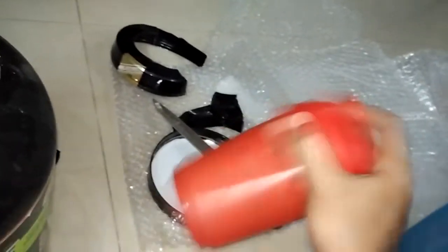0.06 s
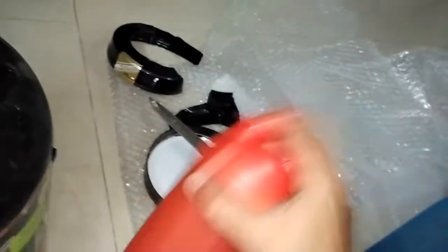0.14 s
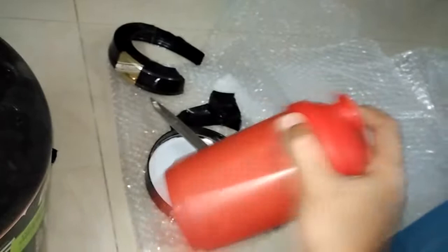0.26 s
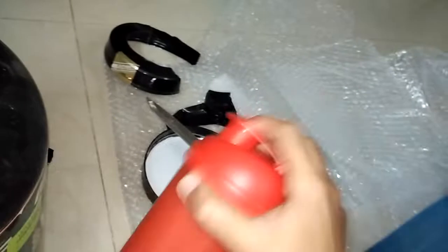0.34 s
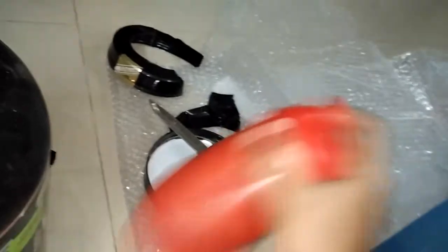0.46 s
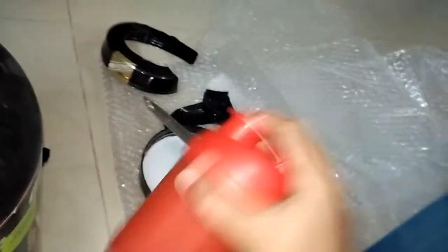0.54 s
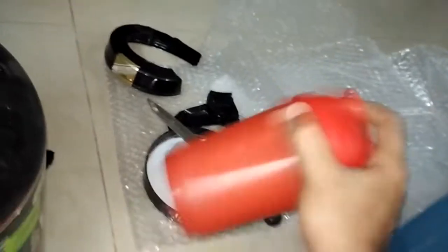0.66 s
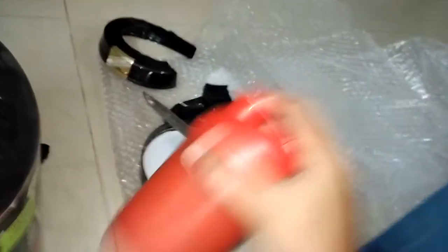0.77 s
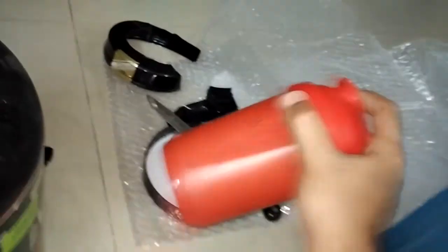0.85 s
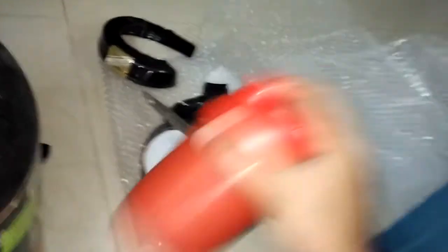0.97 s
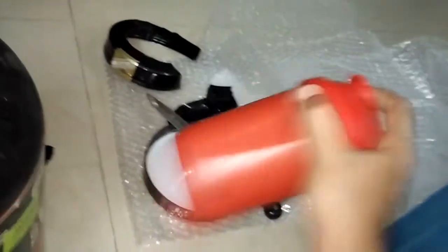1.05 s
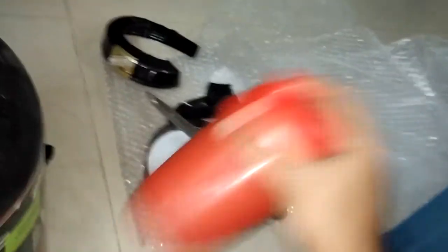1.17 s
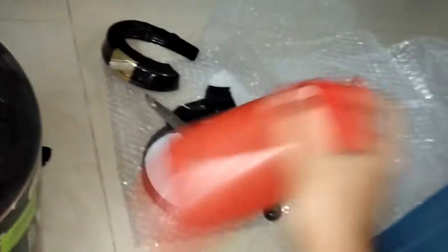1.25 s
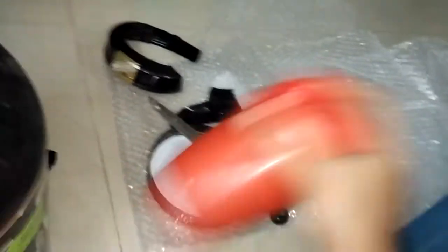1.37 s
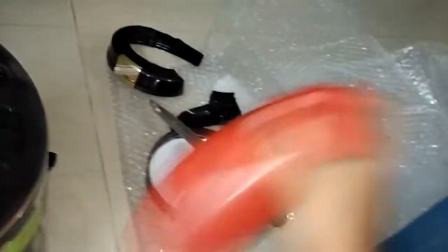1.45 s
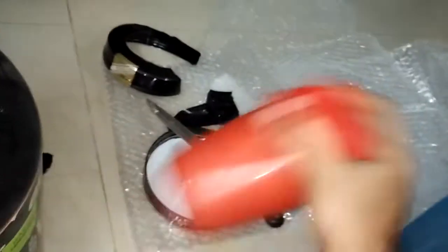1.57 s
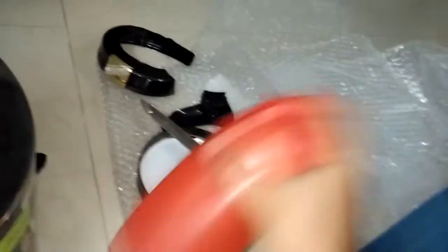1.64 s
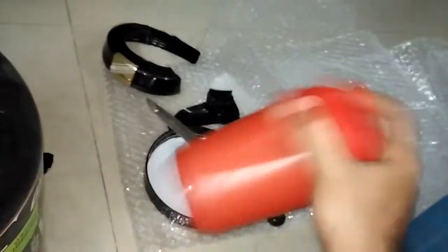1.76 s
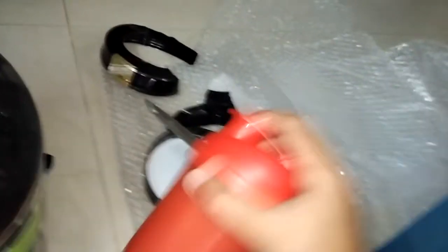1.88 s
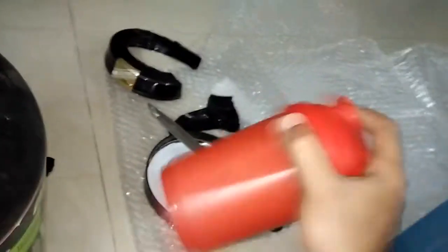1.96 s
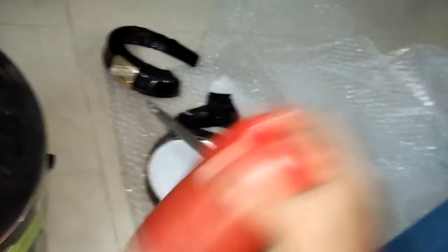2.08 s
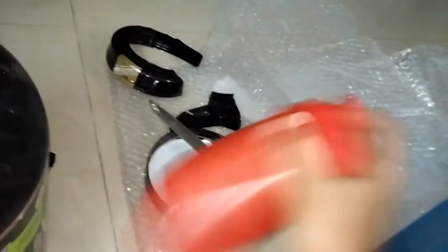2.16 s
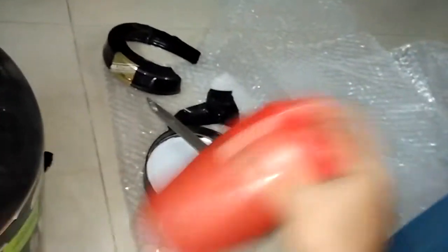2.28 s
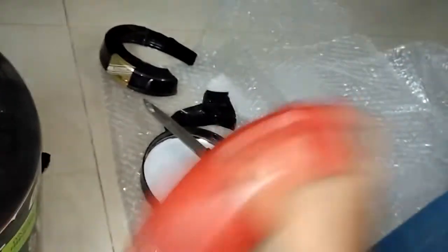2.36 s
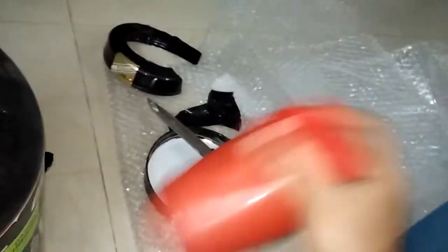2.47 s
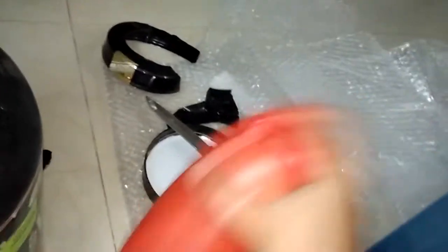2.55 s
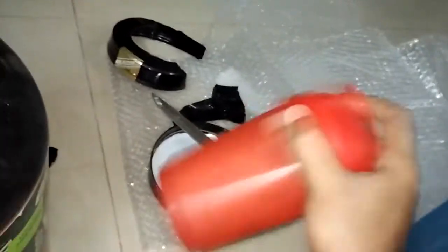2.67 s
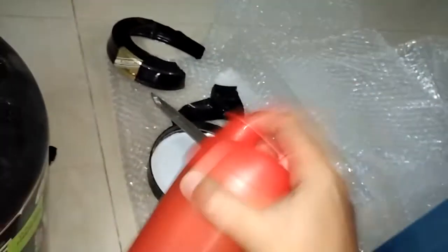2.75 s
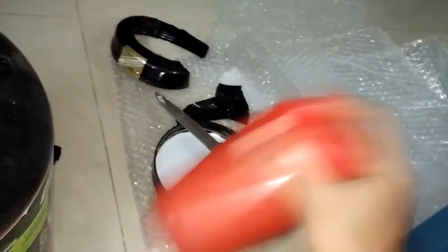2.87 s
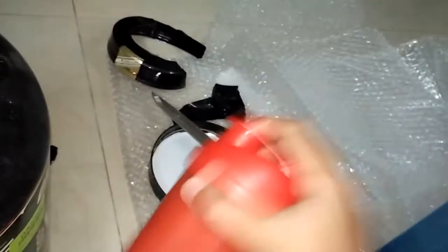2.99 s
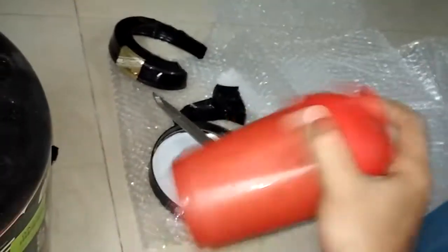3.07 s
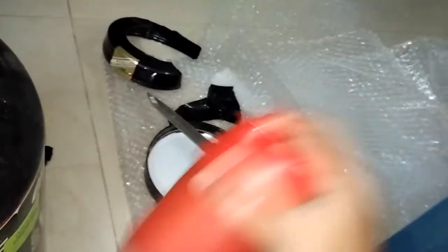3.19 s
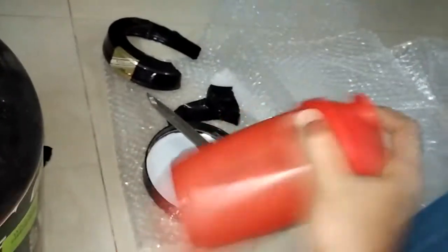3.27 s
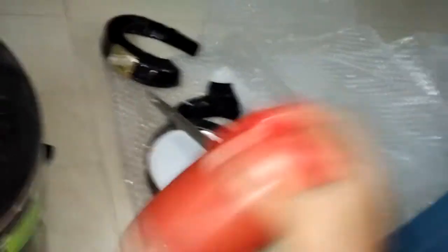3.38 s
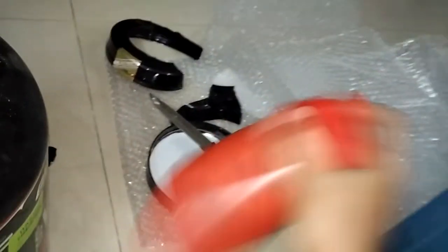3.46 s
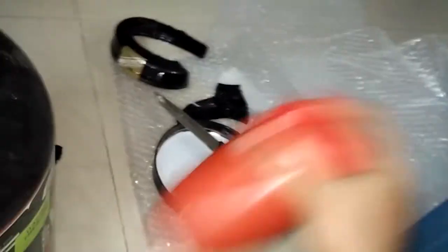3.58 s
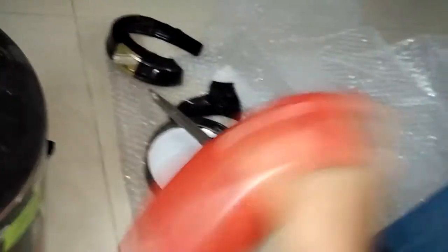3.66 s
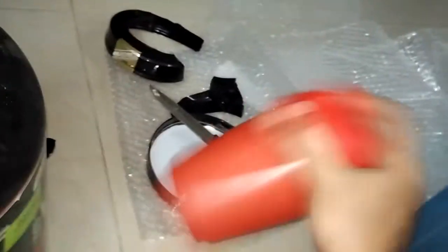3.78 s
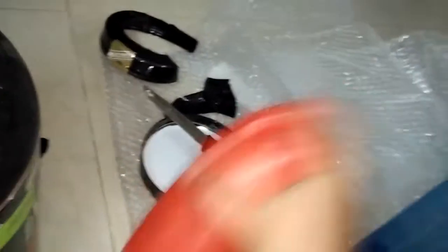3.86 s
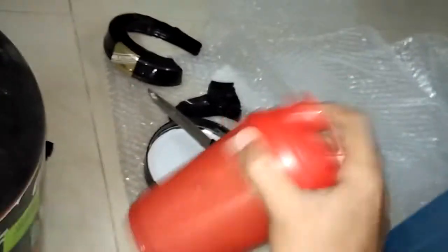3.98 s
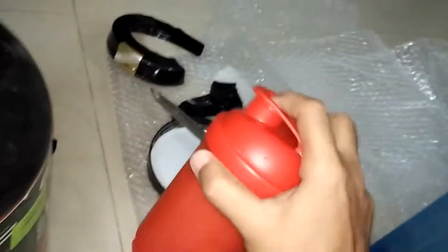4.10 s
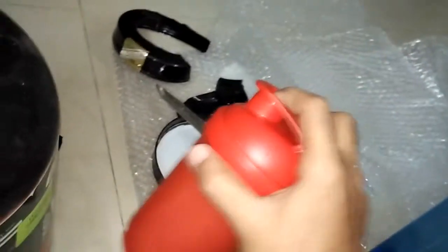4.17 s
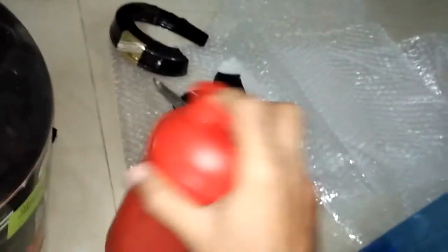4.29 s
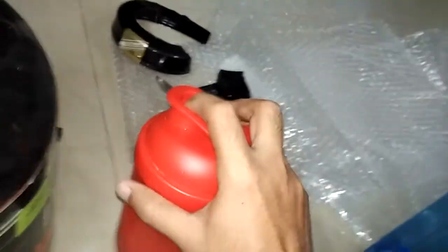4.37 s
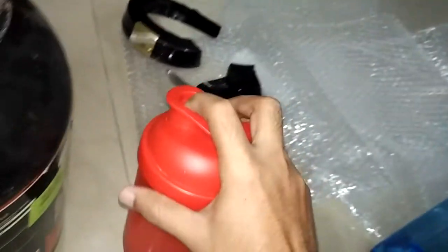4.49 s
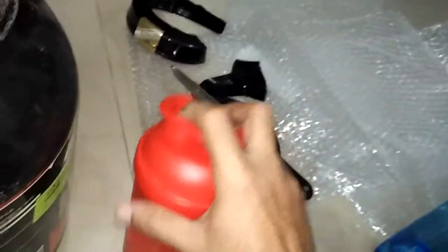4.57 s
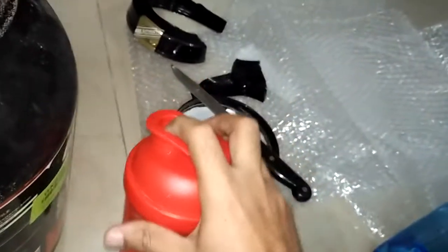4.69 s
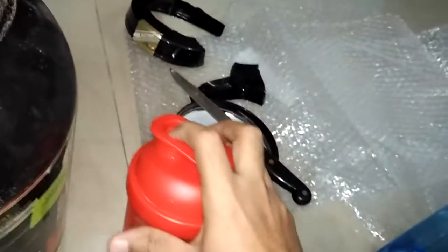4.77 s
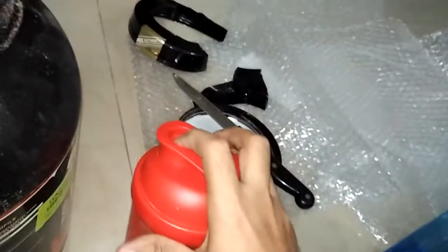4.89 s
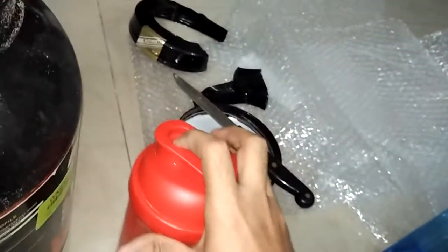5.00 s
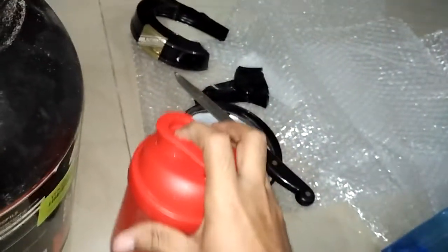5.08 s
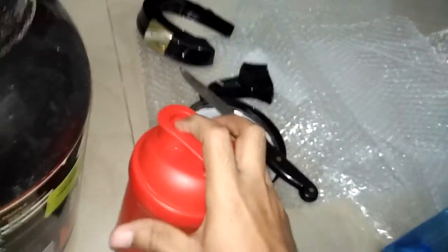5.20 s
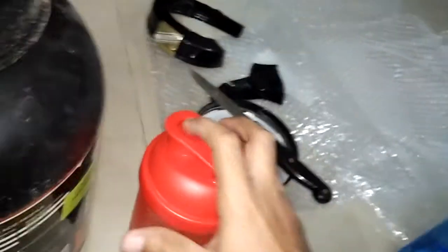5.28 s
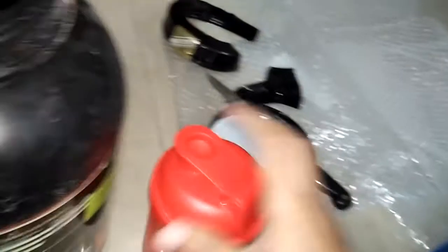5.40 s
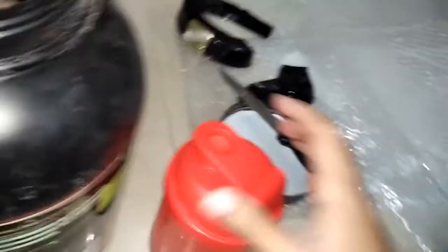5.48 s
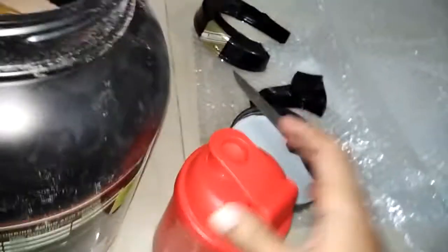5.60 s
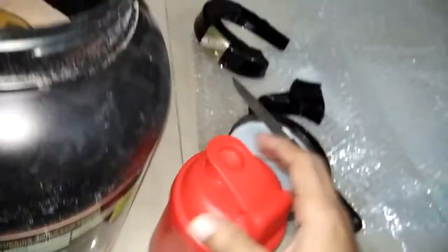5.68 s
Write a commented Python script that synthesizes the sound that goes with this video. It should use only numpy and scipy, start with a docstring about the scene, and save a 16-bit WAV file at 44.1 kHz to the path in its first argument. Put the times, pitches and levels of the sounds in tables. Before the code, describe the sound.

A phone close by picks up vigorous shaking of a drink in a plastic bottle: bright hissy spray, slapping liquid, short ringing bubble pops and small lid clicks in steady rhythm. The sloshing fades to a few drops, then a loud crack-like set-down, a faint slide and a final muted knock, over low quiet room noise.

```python
"""A plastic shaker bottle with a drink in it is shaken hard, about five times a second, close to a phone in a bare room.
In every shake the liquid slams into the lid (coloured noise), bursts an air pocket (a short ringing tone),
sprays through the mixing grid (grainy noise) and gurgles back to the base (a cloud of tiny tones).
After a last weak slosh the bottle is set down with a sharp knock (thump, crack and ringing modes),
shifted a little with a scrape, and knocks once more as the hand lets go."""
import sys
import numpy as np
from scipy import signal
from scipy.fft import rfft, irfft, next_fast_len
from scipy.io import wavfile
from scipy.ndimage import uniform_filter1d

SR = 44100
rng = np.random.default_rng(int(sys.argv[2]) if len(sys.argv) > 2 else 0)


def put_to_file(sound):
    """Save the sound as 16-bit audio at rate SR, in the file named by the first command-line argument."""
    columns = np.atleast_2d(sound).T  # one column per channel
    safe = np.clip(columns, -1, 1)
    whole_steps = np.round(safe * 32767)
    wavfile.write(sys.argv[1], SR, whole_steps.astype(np.int16))


N = 253132
T = np.arange(N) / SR


def undb(db):
    """Decibels to gain."""
    return 10 ** (np.asarray(db) / 20)


def at(points, hz):
    """Read (Hz, value) points on a log-frequency axis."""
    point_hz, value = np.transpose(points)
    return np.interp(np.log(hz + 1), np.log(point_hz), value)


def unit_power(gain):
    """Scale a gain curve to a mean power of one."""
    return gain / np.sqrt(np.mean(gain ** 2))


def colour(x, points):
    """Filter by a spectrum, keeping the power of white noise."""
    size = x.shape[-1]
    gain = undb(at(points, np.fft.rfftfreq(size, 1 / SR)))
    return irfft(rfft(x) * unit_power(gain), size)


def low_pass(x, order, cutoff_hz):
    """Take off the treble above a cut-off."""
    return signal.sosfilt(signal.butter(order, cutoff_hz, fs=SR, output="sos"), x)


def noise(size, apart_hz=1500):
    """Noise at two close ports: alike in the bass, unrelated in the treble."""
    size_fast = next_fast_len(size, True)
    mid, side = rfft(rng.standard_normal((2, size_fast)))
    alike = 0.95 / (1 + (np.fft.rfftfreq(size_fast, 1 / SR) / apart_hz) ** 3)
    mid = mid * np.sqrt((1 + alike) / 2)
    side = side * np.sqrt((1 - alike) / 2)
    return irfft(np.array([mid + side, mid - side]), size_fast)


def grainy(points, grain_db, grain_samples=40):
    """Crowds of short grains of uneven level and a common spectrum; 40 samples make millisecond droplets."""
    x = noise(N)
    drift = uniform_filter1d(rng.standard_normal(x.shape[1]), grain_samples)
    grains = undb(grain_db * np.sqrt(grain_samples) * drift)
    return colour(x * unit_power(grains), points)[:, :N]


def patchy(x, patchy_db, size=256):
    """Sheets of liquid open and close cavities, so patches of the spectrum swell and fade within about 10 ms."""
    spectrum = signal.stft(x, nperseg=size)[2]
    field = rng.standard_normal(spectrum.shape[1:])
    field = uniform_filter1d(field, size=3, axis=0)  # across frequency
    field = uniform_filter1d(field, size=4, axis=1)  # across time
    gain = undb(patchy_db * np.minimum(field / field.std(), 2))
    return signal.istft(spectrum * unit_power(gain), nperseg=size)[1][:, :N]


def add(out, s, sound):
    """Mix a sound in at a time."""
    i = max(int(s * SR), 0)
    out[:, i:i + sound.shape[-1]] += sound[..., :N - i]


def swells(hits, levels_db, delay_s, rise_s, fall_s):
    """One smooth swell for each hit, dying away exponentially; their powers add."""
    power = np.zeros(N)
    for s, db in zip(hits, levels_db):
        start = s + delay_s
        near = slice(*np.searchsorted(T, [start, start + 1]))
        age = T[near] - start
        rise = np.sin(np.pi / 2 * np.minimum(age / rise_s, 1)) ** 2
        fall = np.exp(-np.maximum(age - rise_s, 0) / fall_s)
        power[near] += (undb(db) * rise * fall) ** 2
    return np.sqrt(power)


def bubble(hz, cycles, lag, size=1100):
    """An air pocket rings for a few cycles, rising a little; it reaches the right port lag seconds later."""
    age = np.maximum(np.arange(size) / SR - np.array([[-lag], [lag]]) / 2, 0)
    turns = hz * age
    tone = np.sin(2 * np.pi * turns * (1 + 0.0016 * turns))
    return tone * (1 - np.exp(-turns / 0.92)) * np.exp(-turns / cycles)


# spectrum of the quiet air: (pitch_hz, relative level_db)
AIR_SPECTRUM = [(25, -18), (65, -2.5), (130, 2), (250, -2), (450, -17.5), (900, -19), (3000, -17),
                (14000, -18)]


def quiet_air():
    """Steady noise of the room, mostly bass."""
    return undb(-66.5) * colour(noise(N), AIR_SPECTRUM)[:, :N]


# spectrum of the echo off the bare walls: (pitch_hz, relative level_db)
ECHO_SPECTRUM = [(50, -14.5), (130, 3), (280, -6.5), (600, -1.5), (1200, -10), (2300, -3), (5000, -4),
                 (14000, -2.5)]
# decay of the echo in each band: (pitch_hz, t60_s)
ECHO_DECAY = [(100, 0.78), (300, 0.8), (1000, 0.63), (3000, 0.66), (10000, 0.55)]


def room(dry, size=40000):
    """Bare walls answer after a few milliseconds; the lows ring longest."""
    t, hz = np.arange(size) / SR, np.fft.rfftfreq(size, 1 / SR)
    spectrum = rfft(colour(noise(size), ECHO_SPECTRUM))
    tail = 0
    # overlapping bands of the echo, each dying at its own rate
    for k, (_, t60) in enumerate(ECHO_DECAY):
        share = at([(f, j == k) for j, (f, _) in enumerate(ECHO_DECAY)], hz)
        tail = tail + irfft(spectrum * share, size) * undb(-60 * t / t60)
    onset = np.clip((t - 0.0025) / 0.0018, 0, 1)
    early_boost = 1 + np.exp(-t / 0.015)
    tail = tail * onset * early_boost
    return undb(-37.5) * signal.fftconvolve(dry, tail, axes=1)[:, :N]


# spectrum of the sliding base: (pitch_hz, relative level_db)
SCRAPE_SPECTRUM = [(200, -14), (700, -2), (1200, -5.5), (1900, 0), (2300, -6.5), (2800, -1), (4000, -10.5),
                   (14000, -12)]
# the base sliding between the knocks: (time_s, level_db)
SLIDE_COURSE = [(4.97, -75), (5.015, -55.5), (5.045, -49.5), (5.075, -57.5), (5.11, -59), (5.17, -87)]


def scrape():
    """The base slides briefly between the knocks, catching and slipping."""
    s, db = np.transpose(SLIDE_COURSE)
    level = undb(np.interp(T, s, db, left=-200, right=-200))
    return level * grainy(SCRAPE_SPECTRUM, grain_db=2.5, grain_samples=300)


# the bottle's ring sinks as the liquid climbs its wall: (time_s, pitch_hz, level_db)
SWAY_COURSE = [(4.72, 370, -48), (4.78, 368, -39), (4.815, 320, -37), (4.86, 265, -45), (4.95, 250, -53),
               (5.1, 248, -80)]


def sway():
    """A single sinking tone while the liquid settles in the bottle."""
    s, hz, db = np.transpose(SWAY_COURSE)
    level = undb(np.interp(T, s, db, left=-200, right=-200))
    return level * np.sin(2 * np.pi * np.cumsum(np.interp(T, s, hz)) / SR)


# ringing modes of the filled bottle: (pitch_hz, t60_s, edge-struck level_db, flat-struck level_db)
BOTTLE_MODES = [(137, 0.15, -44, -50), (252.8, 0.093, -15.5, -26), (291, 0.065, -17, -38),
                (694, 0.053, -34.5, -29), (767, 0.063, -30, -26), (820, 0.063, -17.5, -34.5),
                (880, 0.15, -40, -34.5), (1244, 0.058, -45.5, -24.5), (1874, 0.047, -24, -49),
                (2210, 0.075, -27, -65), (2576, 0.036, -43, -42.5)]
# spectrum of the hard contact: (pitch_hz, relative level_db)
CRACK_SPECTRUM = [(150, -3.5), (500, 8.5), (1100, 3), (2200, 0.5), (2900, -16.5), (3600, -2.5), (5000, -17),
                  (7000, -10), (14000, -13.5)]
# knocks: (start_s, flatness 0-1, thump level_db, crack level_db, first contact cutoff_hz, rebound share 0-1)
KNOCK_EVENTS = [(4.6911, 0.17, -8, -13, 16000, 0.73), (5.435, 0.71, -19, -26, 3800, 0.36)]


def knocks(size=8192, contacts=6):
    """The base bounces on the surface every few milliseconds; each contact thumps and cracks, and the bottle rings."""
    out, t = np.zeros((2, N)), np.arange(size) / SR
    for s, flat, thump_db, crack_db, contact_hz, rebound in KNOCK_EVENTS:
        ring = 0
        for hz, t60, edge_db, flat_db in BOTTLE_MODES:
            mode_db = edge_db + flat * (flat_db - edge_db)
            ring = ring + undb(mode_db - 60 * t / t60) * np.sin(2 * np.pi * hz * t)
        add(out, s, -ring * (1 - np.exp(-t / 0.0011)))
        for k in range(contacts):
            # later contacts are softer: they last longer and lose their treble
            push_s = 0.00028 * np.sqrt(1 + k)
            thump = undb(thump_db) * (t / push_s) * np.exp(1 - t / push_s)
            crack = colour(noise(size), CRACK_SPECTRUM) * np.exp(-t / 0.0012)
            crack = crack * undb(crack_db) / (1 + k) ** 1.2
            contact = low_pass(thump + crack, 2, contact_hz / (1 + k) ** 0.6)
            add(out, s + k * 0.00288, rebound ** k * contact)
    # so small a body radiates no deep bass
    return signal.sosfilt(signal.butter(4, 140, "high", fs=SR, output="sos"), out + sway())


# spectrum of spray, shared by lid ticks and drops: (pitch_hz, relative level_db)
SPRAY_SPECTRUM = [(500, -54), (1500, 5.5), (2500, 3.5), (4000, -0.5), (5000, 1), (6500, 1), (9000, 4.5),
                  (12000, -0.5), (15000, -4)]
# the plastic lid ticking under the fingers: (start_s, level_db)
LID_TICKS = [(0.382, -36.5), (0.738, -37.5), (1.099, -33), (1.4683, -36.5), (1.9, -33), (2.802, -32),
             (3.329, -56), (4.203, -48)]


def ticks(size=1024):
    """Short bright clicks of the lid."""
    out = np.zeros((2, N))
    fade = np.exp(-np.arange(size) / SR / 0.0062)
    for s, db in LID_TICKS:
        add(out, s, undb(db) * colour(noise(size), SPRAY_SPECTRUM) * fade)
    return out


# effort of the arm, driving drops, back spray and wash: (time_s, level_db)
ARM_EFFORT = [(0, -1), (2.2, 1.5), (2.55, -2), (3.1, -0.5), (3.85, 0.5), (4.05, -4), (4.15, -9),
              (4.27, -23.5), (4.5, -30)]
SPATTER_COUNT = 260
SPATTER_DB, SPATTER_RANGE_DB = -31, 17  # largest drop at 0 dB of effort; from there down to the smallest
SPATTER_PER_EFFORT = 0.9  # dB of drop per dB of effort


def spatter():
    """Single drops flick against the wall, ever fainter as the shaking stops."""
    out = np.zeros((2, N))
    for place, size, side in rng.random((SPATTER_COUNT, 3)):
        s = place * ARM_EFFORT[-1][0]
        effort_db = np.interp(s, *np.transpose(ARM_EFFORT))
        db = SPATTER_DB + SPATTER_PER_EFFORT * effort_db - SPATTER_RANGE_DB * np.sqrt(size)
        add(out, s, undb(db) * np.sqrt([[side], [1 - side]]))
    t = np.arange(256) / SR
    splat = rng.standard_normal((2, len(t))) * np.exp(-t / 0.0011)
    return colour(signal.fftconvolve(out, splat, axes=1)[:, :N], SPRAY_SPECTRUM)


# every shake, timed when the liquid hits the lid, also played by the gurgles, spray and splash:
# (hit_s, spray level_db, splash level_db, air pocket level_db, gurgle level_db)
SHAKE_HITS = [(-.005, -40, -38.5, -39, -49.5), (0.186, -40.5, -39, -42, -46),
              (0.3809, -42, -50, -24.5, -47), (.557, -42, -47, -20.5, -47), (.739, -41, -42.5, -17, -47.5),
              (.924, -40, -36, -25, -50), (1.125, -42, -39.5, -35, -43), (1.310, -40, -36, -17.5, -47.5),
              (1.498, -38, -41.5, -37, -49), (1.691, -40, -39, -21, -45.5), (1.863, -37.5, -37, -22, -50.5),
              (2.061, -38.5, -35, -21, -42), (2.241, -41.5, -44, -21, -44.5), (2.434, -45.5, -46, -29, -47),
              (2.613, -41, -43.5, -26.5, -47.5), (2.795, -40, -41, -19.5, -49.5),
              (2.974, -41, -37, -22.5, -44.5), (3.153, -44, -41, -25, -49.5),
              (3.343, -39.5, -46.5, -48, -48), (3.534, -40.5, -42.5, -43, -47),
              (3.716, -41.5, -40, -49, -44.5), (3.898, -42.5, -44.5, -36, -47),
              (4.1953, -67, -61.5, -34, -56.5)]
# lone large bubbles in the sloshing liquid: (start_s, level_db, pitch_hz)
LONE_GLUGS = [(.4796, -27.5, 1980), (2.079, -31, 810), (2.133, -24, 1690), (2.1535, -32, 694),
              (2.235, -27, 850), (3.065, -25, 1840), (3.233, -31, 1320), (3.809, -28, 920),
              (4.241, -38, 1090), (4.2617, -29, 1873), (4.292, -39.5, 843), (4.362, -43.5, 847)]
# spectrum of splash and splat: (pitch_hz, relative level_db)
SPLASH_SPECTRUM = [(60, -18.5), (150, -19), (300, -9), (500, -10.5), (850, 1.5), (1150, -8.5), (1700, -3.5),
                   (2350, 8.5), (2900, -3), (3800, -3), (6000, -4.5), (12000, -42)]
POCKET_HZ, POCKET_SPREAD_OCT = 2306, 0.044  # air trapped under the lid
SPLAT_DB, SPLAT_FALL_S = -19.5, 0.0055  # level against the bubble that bursts


def pockets(size=1100):
    """Trapped air bursts near one pitch at every hit, and lone bubbles glug; each throws up a short splat."""
    out, t = np.zeros((2, N)), np.arange(size) / SR
    bursts = [(s, db, POCKET_HZ * 2 ** (POCKET_SPREAD_OCT * rng.standard_normal()))
              for s, _, _, db, _ in SHAKE_HITS]
    for s, db, hz in bursts + list(LONE_GLUGS):
        splat = colour(noise(size), SPLASH_SPECTRUM)[:, :size]
        splat = undb(SPLAT_DB) * splat * np.exp(-t / SPLAT_FALL_S)
        ring = undb(-0.5) * bubble(hz, cycles=2.62, lag=7e-5, size=size)
        add(out, s, undb(db) * (ring + splat))
    return out


GURGLE_DELAY_S, GURGLE_SPREAD_S = 0.110, 0.019  # middle and width of the bubble cloud after the hit
GURGLE_HZ, GURGLE_SPREAD_OCT = 1019, 0.824
GURGLE_SINK_OCT = 0.22  # the pitch sinks by this much in each spread of time
GURGLE_AT_DB, GURGLE_OCT_PER_DB = -47, -0.0055  # harder sloshes trap larger, lower bubbles
BUBBLE_SCATTER_DB, BUBBLE_DB_PER_OCT = 8.5, 3.5  # uneven sizes; tilt with pitch
CLOUD_CREST_DB = 23  # summed peaks over the cloud's level


def gurgles(count=140):
    """The returning liquid folds air in: a cloud of bubbles, small first and tending larger and lower after."""
    out = np.zeros((2, N))
    for s, _, _, _, db in SHAKE_HITS:
        when, pitch, size, lag = rng.standard_normal((count, 4)).T
        when = np.clip(when, -2, 2)
        octaves = GURGLE_SPREAD_OCT * np.clip(pitch, -2, 2) - GURGLE_SINK_OCT * when
        octaves = octaves + GURGLE_OCT_PER_DB * (db - GURGLE_AT_DB)
        hz = GURGLE_HZ * 2 ** octaves
        gain = undb(BUBBLE_SCATTER_DB * np.minimum(size, 1.5) + BUBBLE_DB_PER_OCT * octaves)
        # the bubbles share the energy of the cloud
        gain = gain * undb(db + CLOUD_CREST_DB) / np.linalg.norm(gain)
        start = s + GURGLE_DELAY_S + GURGLE_SPREAD_S * when
        for k in range(count):
            add(out, start[k], gain[k] * bubble(hz[k], cycles=2.21, lag=5e-5 + 0.00019 * lag[k]))
    return out


# spectrum of the whole mass washing about: (pitch_hz, relative level_db)
WASH_SPECTRUM = [(30, -17), (60, 8.5), (140, -5.5), (280, 6), (500, 2), (850, 7), (1400, -1.5),
                 (2300, -1.5), (4000, -9), (9000, -30)]
BACK_SPRAY_DB, WASH_DB = -44, -59.5  # at 0 dB of effort
WASH_PER_EFFORT = 0.49  # dB of wash per dB of effort


def spray_and_splash():
    """Each throw splashes on the lid; both ways the liquid tears into spray, over the wash of the whole mass."""
    hits, spray_db, splash_db, _, _ = np.transpose(SHAKE_HITS)
    effort_db = np.interp(T, *np.transpose(ARM_EFFORT))
    back_db = np.full(len(hits), BACK_SPRAY_DB)
    throw_spray = swells(hits, spray_db, delay_s=-0.023, rise_s=0.025, fall_s=0.04)
    back_spray = undb(effort_db) * swells(hits, back_db, delay_s=0.056, rise_s=0.022, fall_s=0.068)
    spray = np.hypot(throw_spray, back_spray)
    splash = swells(hits, splash_db, delay_s=-0.013, rise_s=0.018, fall_s=0.018)
    wash = undb(WASH_DB + WASH_PER_EFFORT * effort_db)
    return (spray * patchy(grainy(SPRAY_SPECTRUM, grain_db=0.5), patchy_db=3.0)
            + splash * patchy(grainy(SPLASH_SPECTRUM, grain_db=3.5), patchy_db=6)
            + wash * patchy(grainy(WASH_SPECTRUM, grain_db=3.5), patchy_db=3.5))


SHAKING_SEND_DB, STANDING_SEND_HZ = -3.5, 6500  # into the room: shaking level, standing bottle's cut-off


def scene():
    """The bottle, its room and the quiet air; standing on the surface, it sends less treble into the room."""
    shaking = spray_and_splash() + gurgles() + pockets() + ticks() + spatter()
    setting_down = knocks() + scrape()
    shaded = low_pass(setting_down, 1, STANDING_SEND_HZ)
    echo = room(undb(SHAKING_SEND_DB) * shaking + shaded)
    return shaking + setting_down + echo + quiet_air()


# colour of the two microphone ports: (pitch_hz, left minus right level_db)
PORT_TILT = [(100, 0.5), (380, 3), (700, 1.5), (1290, -4), (2300, -5.5), (3200, 3), (4400, 3.5),
             (8000, 6.5), (14000, -3)]
TOP_HZ = 14300


def record(dry):
    """Each port has its own colour; the phone cuts the top."""
    size = next_fast_len(N, True)
    tilt_db = at(PORT_TILT, np.fft.rfftfreq(size, 1 / SR))
    gains = undb(np.array([tilt_db, -tilt_db]) / 2)
    gains = gains / np.sqrt(np.mean(gains ** 2, axis=0))  # same total power at every pitch
    heard = irfft(rfft(dry, size) * gains, size)[:, :N]
    return signal.sosfilt(signal.ellip(10, 0.2, 70, TOP_HZ, fs=SR, output="sos"), heard)


dry = scene()
out = record(dry)
put_to_file(out)
```